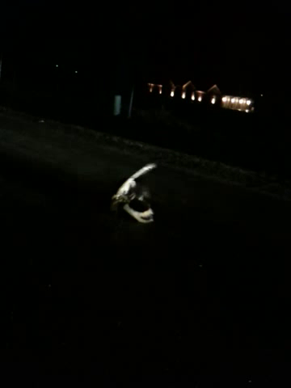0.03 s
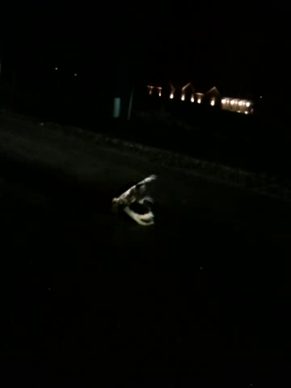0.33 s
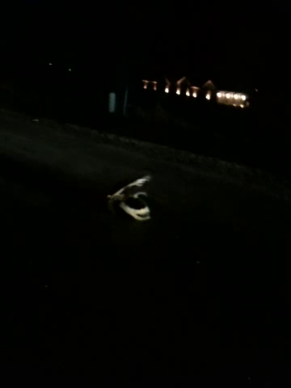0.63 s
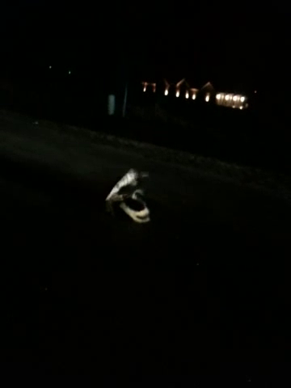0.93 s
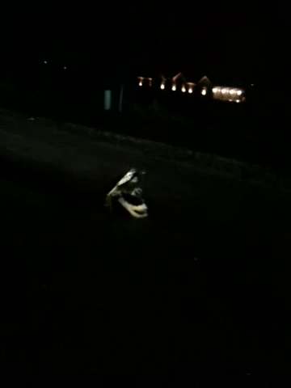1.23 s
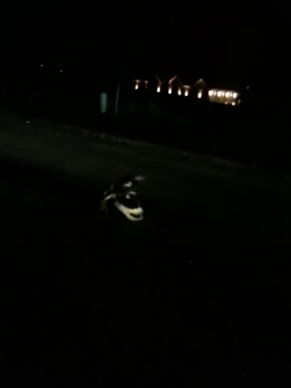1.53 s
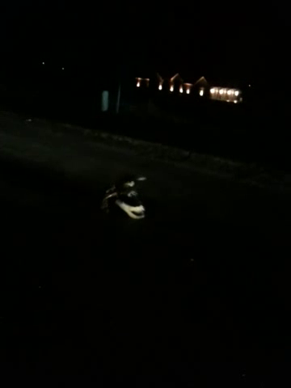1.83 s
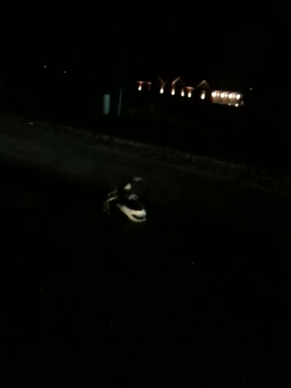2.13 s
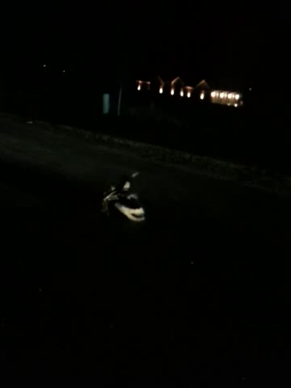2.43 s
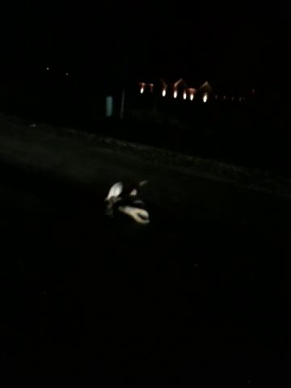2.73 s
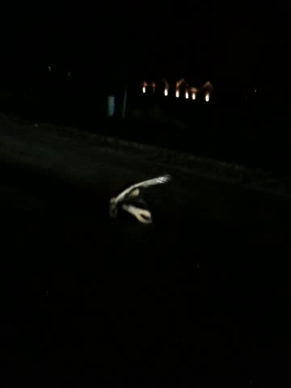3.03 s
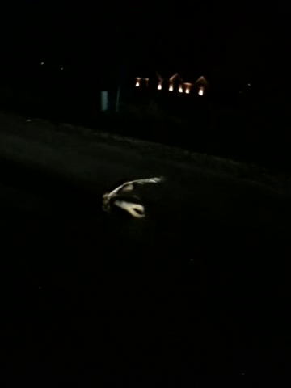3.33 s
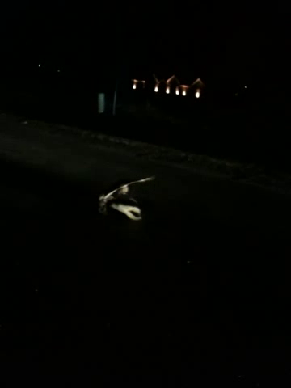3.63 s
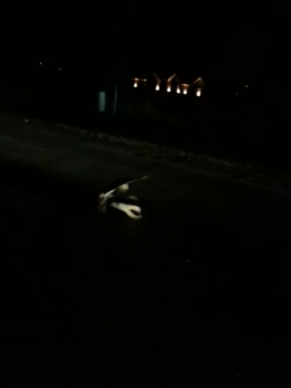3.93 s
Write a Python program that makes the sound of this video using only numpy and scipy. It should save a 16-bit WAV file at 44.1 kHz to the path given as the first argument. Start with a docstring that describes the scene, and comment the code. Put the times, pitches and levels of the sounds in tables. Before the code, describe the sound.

An unseen animal gives three high whistles while wind rumbles and pops against the microphone.

```python
"""Outdoors at night, an unseen animal gives three thin, whistling cries with a faint echo.
Each cry is one gliding tone with three overtones. Wind rumbles on the microphone, and now and
then a single swirl of air pops against it. A few tiny dry clicks sound close by.
Behind it all lie a soft hiss, a faint steady whine and two brief high sizzles."""
import sys
import numpy as np
from scipy import signal
from scipy.fft import rfft, irfft, next_fast_len
from scipy.io import wavfile
from scipy.ndimage import map_coordinates

SR = 44100
rng = np.random.default_rng(int(sys.argv[2]) if len(sys.argv) > 2 else 0)


def to_wav(sig):
    """Store sig (one row per channel, or 1-D mono) as 16-bit WAV at the path in sys.argv[1].

    Samples outside -1..1 are clipped; the rate is SR.
    """
    pcm = np.clip(np.atleast_2d(sig), -1, 1) * 32767
    pcm = np.round(pcm).astype(np.int16)
    wavfile.write(sys.argv[1], SR, pcm.T)  # frames by channels


N = 176400  # 4 seconds


def amp(db):
    """Turn decibels into a number to multiply a sound by."""
    return 10 ** (np.asarray(db) / 20)


def curves(rows):
    """Join rows that start with a time by straight lines: one curve for each later column."""
    times, *columns = np.transpose(rows)
    return [np.interp(np.arange(N) / SR, times, column) for column in columns]


def wobble(rate):
    """A smooth curve through `rate` random values a second."""
    points = rng.standard_normal(int(N * rate / SR) + 4)
    return map_coordinates(points, [np.arange(N) * rate / SR])


def filtered(sound, gain_at):
    """Multiply each frequency in the sound by gain_at(frequency in Hz)."""
    size = next_fast_len(N + 8192)
    return irfft(rfft(sound, size) * gain_at(np.fft.rfftfreq(size, 1 / SR)), size)[:N]


def noise(spectrum, flutter_db=0, rate=50):
    """Noise with the given tone colour and an average power of 1; its level can flutter."""
    freqs, db = np.transpose(spectrum)
    white = rng.standard_normal(N) * amp(flutter_db * wobble(rate))
    coloured = filtered(white, lambda hz: amp(np.interp(np.log(hz + 1), np.log(freqs), db)))
    return coloured / np.sqrt(np.mean(coloured ** 2) + 1e-20)


def cries():
    """An animal's slightly trembling whistles, whose overtones trade strength as the pitch glides."""
    # One table per cry. Each row: time in seconds, pitch in Hz, then the levels in dB
    # of the tones at one, two and three times that pitch.
    first_cry = [(0.0, 2340, -43, -51, -70), (0.006, 2339, -53.5, -59, -69), (0.034, 2306, -49.5, -66, -61),
                 (0.044, 2295, -50, -74, -66), (0.084, 2243, -51.5, -64, -61), (0.128, 2232, -52, -70, -62),
                 (0.16, 2245, -51, -61, -66), (0.184, 2176, -57, -57.5, -63), (0.196, 2156, -66, -79, -85)]
    second_cry = [(0.838, 2010, -61, -80, -83), (0.848, 2035, -49, -77, -64), (0.866, 2090, -52, -63, -67),
                  (0.886, 2153, -52, -71, -65), (0.904, 2188, -53, -60.5, -76),
                  (0.955, 2165, -49.5, -70, -69), (1.0, 2140, -51, -74, -62), (1.024, 2130, -52, -70, -60),
                  (1.074, 2150, -53.5, -72, -64), (1.106, 2188, -53, -58, -67), (1.15, 2180, -52, -61, -69),
                  (1.178, 2157, -51, -71, -60), (1.222, 2160, -53, -67, -61), (1.254, 2115, -51, -60, -68),
                  (1.268, 2030, -68, -75, -85)]
    third_cry = [(3.198,1940,-60,-84,-68),(3.222,2087,-63,-77,-62),(3.27,2170,-61,-76,-69),(3.298,2223,-57,-73,-59),(3.316,2255,-53,-82,-63),(3.336,2292,-51.5,-77,-61),(3.362,2310,-50.5,-78,-63),(3.381,2260,-50.5,-82,-62),(3.413,2222,-50.5,-66,-58),(3.478,2200,-53.5,-63,-60.5),(3.502,2100,-47.5,-67,-54.5),(3.512,2048,-70,-62,-75)]
    fade_s, pitch_tremble, shimmer_db = 0.0034, 0.0018, 0.53
    t, out = np.arange(N) / SR, np.zeros(N)
    for cry in (first_cry, second_cry, third_cry):
        pitch, *levels = curves(cry)
        levels.append(levels[0] - 32)  # a fourth tone, 32 dB below the first
        phase = 2 * np.pi * np.cumsum(pitch * (1 + pitch_tremble * wobble(170))) / SR
        start, end = cry[0][0], cry[-1][0]
        fade = np.clip(np.minimum(t - start, end - t) / fade_s, 0, 1)
        for multiple, db in enumerate(levels, 1):
            out += fade * amp(db + shimmer_db * wobble(70)) * np.sin(multiple * phase)
    return np.sqrt(2) * out


def echo(sound):
    """The surroundings throw back a faint, smeared copy of the sound."""
    level_db, fade_s = -14, 0.61  # the echo drops by 60 dB in fade_s
    t = np.arange(SR) / SR
    tail = rng.standard_normal(SR) * amp(-60 * t / fade_s)
    return amp(level_db) * signal.fftconvolve(sound, tail / np.linalg.norm(tail))[:N]


def wind():
    """Wind on the microphone makes a lumpy rumble and a brighter, fluttering rush."""
    # Each row: time in seconds, level in dB.
    rumble_levels = [(0,-42),(0.23,-39.5),(0.44,-41.5),(0.485,-48),(0.515,-38.5),(0.59,-39.5),(0.76,-35.5),(0.92,-38),(1.06,-44.5),(1.12,-39.5),(1.19,-34.5),(1.3,-32),(1.37,-34),(1.41,-43.5),(1.46,-34),(1.6,-35.5),(2.37,-35),(2.46,-42.5),(2.55,-35.5),(2.66,-38),(2.84,-34),(2.96,-42.5),(3.08,-35),(3.14,-41),(3.44,-36),(3.54,-40),(3.76,-40),(3.94,-37),(4,-38.5)]
    rush_levels = [(0, -54), (0.45, -55), (0.62, -50), (0.82, -48.5), (1.0, -51.5), (1.2, -46.5),
                   (1.55, -46.5), (1.8, -47), (2.1, -48), (2.35, -46), (2.46, -49.5), (2.56, -48.5),
                   (2.87, -48.5), (2.96, -49.5), (3.07, -46), (3.18, -49.5), (3.42, -49.5), (4, -50.1)]
    # Each row: frequency in Hz, relative strength in dB.
    rumble_spectrum = [(20,-52),(35,-47),(50,-27.5),(75,-17.5),(100,-9.5),(130,-2.5),(170,1),(240,-3.5),(330,-9.5),(480,-17),(700,-27.5),(1500,-61),(4000,-120)]
    rush_spectrum = [(100,-14),(250,4),(400,6.5),(650,3.5),(1000,-0.5),(1350,-5.5),(1700,-5),(2200,-12.5),(2900,-16.5),(3700,-24),(4800,-25.5),(6000,-30.5),(10000,-51)]
    rumble_db = curves(rumble_levels)[0] + 1
    rush_db = curves(rush_levels)[0]
    swirls = wobble(24.88)  # both layers swell and sink together
    rumble = amp(rumble_db + 0.65 * swirls) * noise(rumble_spectrum, flutter_db=1.2, rate=65)
    rush = amp(rush_db + 0.92 * swirls) * noise(rush_spectrum, flutter_db=1.4, rate=220)
    return rumble + rush


def wind_pops():
    """Single swirls of air hit the microphone: dull thuds that rise in pitch, with a soft scuff."""
    # Each row: middle of the pop in seconds, level in dB, pitch in Hz, width in seconds,
    # level of the scuff in dB relative to the thud.
    pops = [(.121,-29,194,0.0058,-26),(.526,-28,189,0.0099,-24),(.64,-30,215,0.0036,-16),(.776,-30.5,293,0.0031,-23),(0.8726,-16,295,0.005,-26),(.876,-29.5,560,0.003,-25),(1.087,-22.5,191,0.0041,-26),(1.434,-20.5,279,0.0035,-12.5),(1.669,-26.5,207,0.0053,-15),(1.997,-32,154,0.0069,-16),(2.126,-29,186,.004,-20),(2.337,-26.5,213,0.0033,-19),(2.987,-23,200,0.0026,-25),(3.046,-16,320,0.003,-18),(3.049,-24,570,0.0016,-17),(3.053,-19.5,188,0.0038,-25),(3.075,-29,390,0.0048,-20),(3.088,-25.5,261,0.0034,-14),(3.439,-27.5,170,0.0084,-26),(3.831,-31,312,.004,-20)]
    # Each row: frequency in Hz, relative strength in dB.
    scuff_spectrum = [(200,4.5),(550,0),(900,-2),(1400,-25),(3000,-40),(6000,-120)]
    pitch_rise, overtone_db, low_cut_hz = 0.23, -19, 115
    t, out = np.arange(N) / SR, np.zeros(N)
    scuff = noise(scuff_spectrum)
    for middle, db, hz, width, scuff_db in pops:
        offset = (t - middle) / width  # time from the middle, counted in widths
        phase = 2 * np.pi * hz * (t - middle) * (1 + pitch_rise * offset / 2)
        phase += rng.uniform(0, 2 * np.pi)
        thud = np.sin(phase) + amp(overtone_db) * np.sin(2 * phase)
        out += amp(db) * np.exp(-offset ** 2) * (thud + amp(scuff_db) * scuff)
    return filtered(out, lambda hz: hz ** 4 / (hz ** 4 + low_cut_hz ** 4))  # take out the deep bass


def clicks():
    """Tiny dry snaps of about a millisecond: a short ring with gritty noise around its pitch."""
    # Each row: start in seconds, level in dB, pitch in Hz, fading time in seconds.
    snaps = [(0.1028,-39,9100,.00015),(1.9112,-47.5,7300,.00018),(1.9116,-52,9500,.00018),(2.2416,-36.5,11000,.00012),(2.2423,-43,12800,.00014),(2.2425,-43.5,7200,.00018),(2.9121,-43.5,5200,.00018),(2.9125,-48.5,8500,.00016),(2.9763,-48.5,8000,.0002),(3.4131,-37.5,8700,.00016)]
    rise_s, grit_gain = 0.0002, 0.6
    t, out = np.arange(SR // 100) / SR, np.zeros(N)
    for start, db, hz, fade_s in snaps:
        shape = (1 - np.exp(-t / rise_s)) ** 2 * np.exp(-t / fade_s)
        ring = np.sin(2 * np.pi * hz * t)
        band = signal.butter(2, [0.7 * hz, 1.3 * hz], 'band', fs=SR, output='sos')
        grit = signal.sosfilt(band, rng.standard_normal(len(t)))
        out[round(start * SR):][:len(t)] += amp(db) * shape / shape.max() * (ring + grit_gain * grit)
    return out


def hiss():
    """A soft, even bed of noise."""
    # Each row: frequency in Hz, relative strength in dB.
    spectrum = [(500,-1),(1500,14),(2800,10.5),(3700,2),(4800,4),(5700,-2.5),(7000,-1.5),(8700,-1),(10000,-7),(11500,-5.5),(14500,-7.5),(17000,-12)]
    return amp(-60) * noise(spectrum)


def whine():
    """Two faint, high tones that never stop and waver a little in level and pitch."""
    # Each row: pitch in Hz, level in dB.
    tones = [(7485,-85),(15030,-91)]
    t, out = np.arange(N) / SR, np.zeros(N)
    for hz, db in tones:
        out += amp(db + 2.3 * wobble(8)) * np.sin(2 * np.pi * hz * t + 1.2 * wobble(25))
    return out


def sizzles():
    """Very high noise that swells quickly twice and sinks back to a faint trace."""
    # Each row: start in seconds, length in seconds, level in dB.
    bursts = [(.19,.18,-75),(3.5,.24,-74)]
    # Each row: frequency in Hz, relative strength in dB.
    spectrum = [(10500,-36),(12400,-9),(13400,-3),(14300,-9),(16000,-28)]
    t, swell = np.arange(N) / SR, np.zeros(N)
    for start, length, db in bursts:
        swell += amp(db) * np.interp(t - start, [0, 0.03, length / 2, length], [0, 1, 0.8, 0.083])
    return swell * noise(spectrum)


def scene():
    """All the sounds add up at one microphone."""
    animal = cries()
    return (animal + echo(animal) + wind() + wind_pops() + clicks() + hiss() + whine() + sizzles())[None]


def record(dry):
    """The recorder keeps nothing above 17300 Hz."""
    return filtered(dry[0], lambda hz: hz < 17300)[None]


dry = scene()
out = record(dry)
to_wav(out)
```